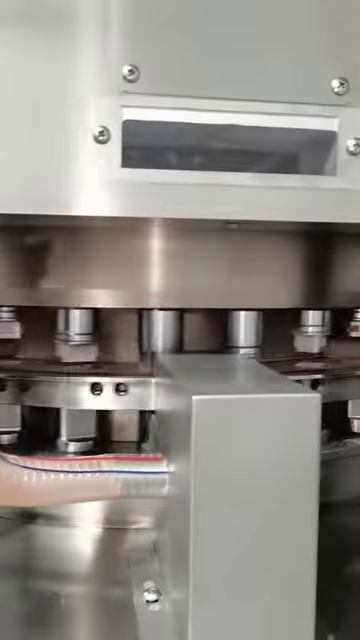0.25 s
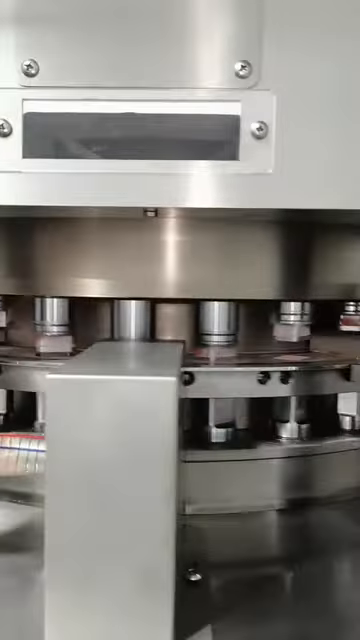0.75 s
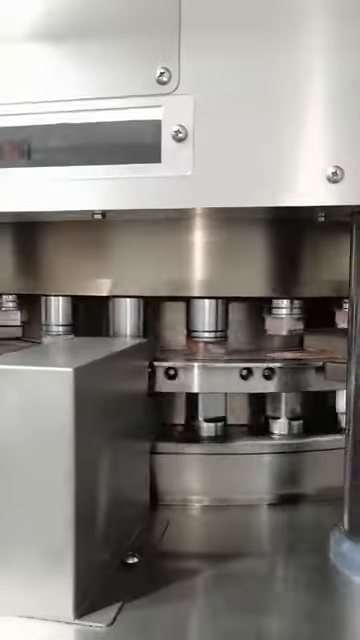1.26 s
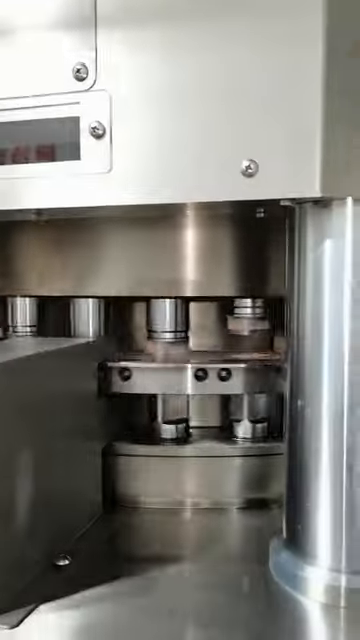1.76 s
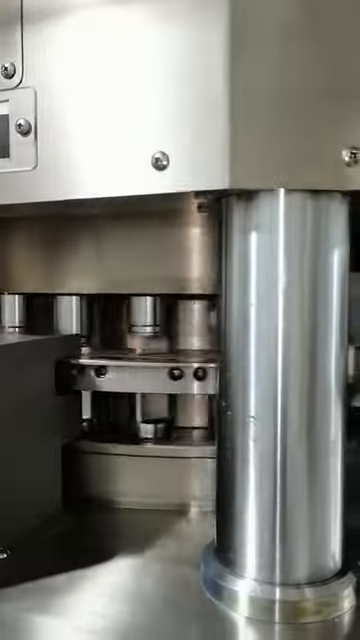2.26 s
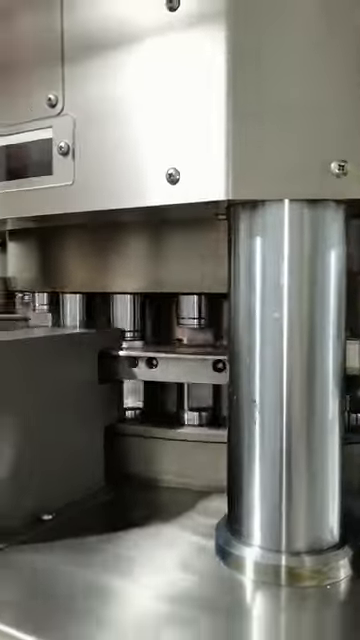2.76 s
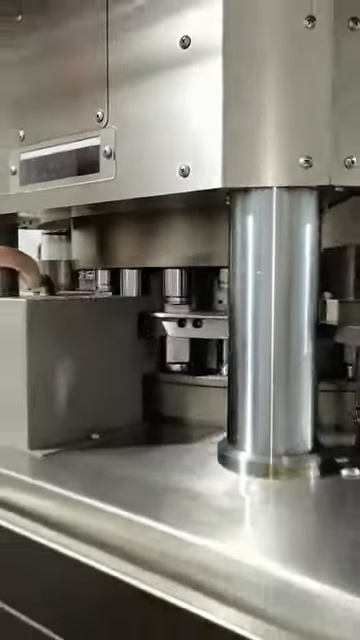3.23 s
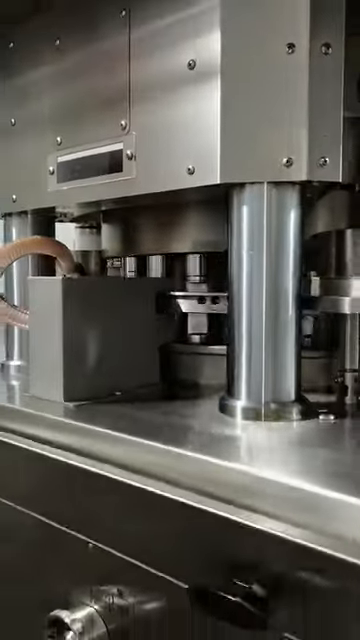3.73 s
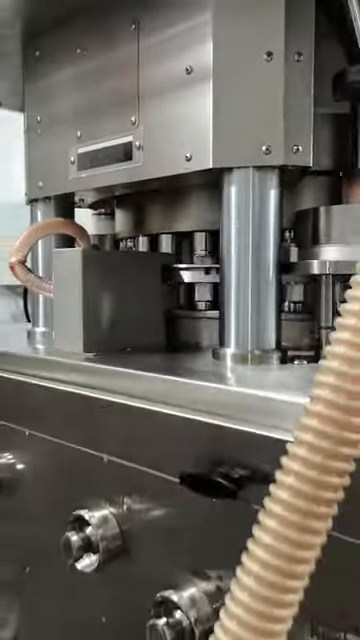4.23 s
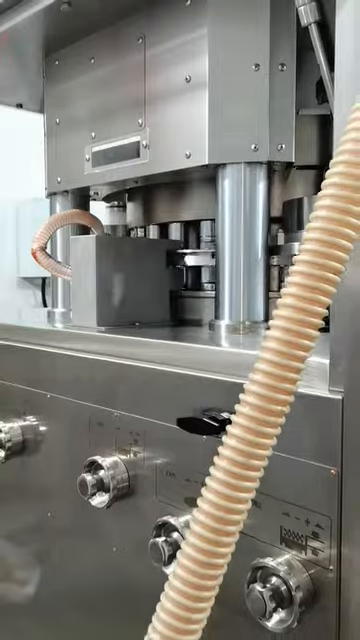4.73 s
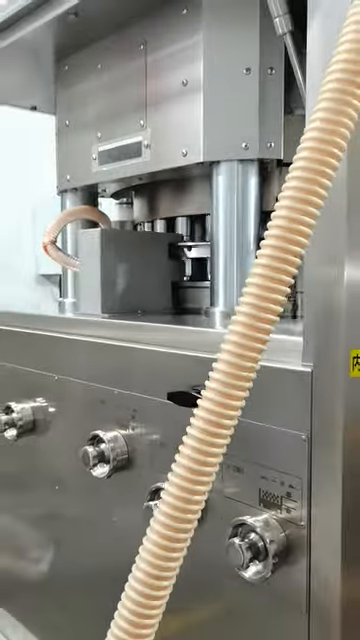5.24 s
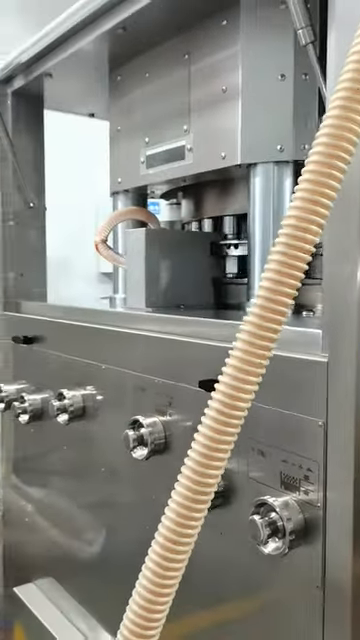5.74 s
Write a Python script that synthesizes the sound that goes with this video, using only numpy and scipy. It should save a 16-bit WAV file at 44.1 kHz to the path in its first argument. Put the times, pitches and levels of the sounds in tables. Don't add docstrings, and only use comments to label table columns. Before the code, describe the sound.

For the full six seconds a rotary tablet press runs steadily in a hard-walled factory hall, heard through a moving handheld stereo microphone. Three blower tones around 312, 332 and 338 hertz beat together; the hum shifts between sides, swells around 1.2 to 2.7 seconds, thins near 3.5, then grows into one strong tone from about 4.2 to the end. Wide air and gear roar fills the space, with an uneven low shaft throb leaning left. Thin drive whines near 4 kilohertz flicker in brief swells, notably near 1.1, 2.9 and 4 seconds. Every 0.27 seconds a small ejection knock precedes a metallic punch clack by a tenth of a second, mostly buried, ringing harder near 1, 1.5, 2 and 3.7 seconds. A dull far knock echoes at 2.4. After 5 seconds, retreat softens the roar and clacks; the extreme top stays dull.

```python
import sys
import numpy as np
from scipy import signal
from scipy.io import wavfile
from scipy.ndimage import uniform_filter1d

SR = 44100
rng = np.random.default_rng(int(sys.argv[2]) if len(sys.argv) > 2 else 0)


def unload_wav(signal):
    wavfile.write(
        sys.argv[1],
        SR,
        np.round(np.clip(np.atleast_2d(signal).T, -1, 1) * 32767).astype(np.int16),
    )


def boost_factor(decibels):
    exponent = np.asarray(decibels, float) / 20
    return 10 ** exponent


N = 264159
T = np.arange(N) / SR


def evened(x):
    return x / np.sqrt(np.mean(x ** 2) + 1e-20)


def read(points, hz):
    f, value = np.transpose(points)
    return np.interp(np.log(hz + 1), np.log(f + 1), value)


def columns(rows, t=T):
    s, *rest = np.transpose(rows)
    return np.array([np.interp(t, s, c) for c in rest])


def drift(rate_hz):
    knots = evened(uniform_filter1d(rng.standard_normal(400), size=3))
    return np.interp(T * rate_hz * 3, np.arange(400), knots)


def crests(rows, width_s, trough_db):
    gain = boost_factor(trough_db)
    for s, db in rows:
        gain = gain + boost_factor(db) * np.exp(-.5 * ((T - s) / width_s) ** 2)
    return 20 * np.log10(gain)


# time_s, distance_m
DISTANCE = [
    (0, 0.54),
    (1.2, 0.49),
    (2.3, 0.55),
    (4.0, 0.57),
    (5.0, 0.64),
    (6.0, 1),
]


def spread_db(t):
    return -20 * np.log10(columns(DISTANCE, t)[0] / .5)


# freq_hz, correlation
PORT_LIKENESS = [(60, 0.9), (130, 0.86), (290, 0.71), (640, 0.3), (1410, 0.02), (3100, 0.02), (6820, 0.01),
                 (15000, -0.01)]
# freq_hz, difference_db
PORT_TILT = [(60, 8.0), (110, 7.5), (200, 3.0), (380, 2.5), (700, -1.0), (1290, -3.0), (2380, -2.5),
             (4400, -4.5), (8120, 0), (15000, -8.5)]


def far_tone(hz, db, blur=.5, rate_hz=3, waver_db=0, side_db=0, flicker_db=4):
    mid_level_db = db + waver_db * drift(rate_hz)
    mid = boost_factor(mid_level_db) * np.cos(2 * np.pi * hz * T + blur * np.pi * drift(rate_hz))
    side_level_db = np.mean(db) + side_db + flicker_db * drift(rate_hz)
    side_phase = 2 * np.pi * (hz * T + rng.random()) + blur * np.pi * drift(rate_hz)
    side = boost_factor(side_level_db) * np.cos(side_phase)
    tilt = boost_factor(read(PORT_TILT, hz) * np.array([[.5], [-.5]]))
    return np.sqrt(2) * np.array([mid + side, mid - side]) * tilt


def far_knock():
    start_s, level_db, rise_s, t60_s, band_hz = 2.36, -22, .02, .9, (400, 840)
    t = np.maximum(T - start_s, 0)
    echo = rng.standard_normal(N) + .4 * rng.standard_normal((2, N))
    dull = signal.sosfilt(signal.butter(2, band_hz, "bandpass", fs=SR, output="sos"), echo)
    return boost_factor(level_db - 60 * t / t60_s) * np.minimum(t / rise_s, 1) * evened(dull)


# freq_hz, density_db_per_hz
ROAR_SPECTRUM = [(20, -45), (40, -35), (70, -27.5), (125, -15.5), (170, -18.5), (300, -18), (500, -21.5),
                 (1000, -21.5), (1150, -23.5), (2150, -22.5), (3140, -29.5), (4070, -23), (5000, -25.5),
                 (6000, -26.5), (7000, -22)]
# freq_hz, gain_db
PORT_RESPONSE = [(7000, -0.5), (7900, 0), (8200, -9.5), (8500, -17), (8900, -18.5), (9300, -14.5),
                 (9700, -10.5), (11000, -11), (13500, -14.5), (14800, -24), (15150, -20), (15200, -34),
                 (15700, -40)]


def roar():
    level_db = -18.5
    near_share = [(200, .81), (2000, .8), (7000, .23)]  # freq_hz, share of the 1 / r law
    frames, hz = N // 512 + 5, np.fft.rfftfreq(2048, 1 / SR)
    a, b, c, d, patches = rng.standard_normal((frames, 1025, 5)).T
    patches = uniform_filter1d(patches, size=24, axis=0)
    patches = evened(uniform_filter1d(patches, size=8, axis=1))
    swell = evened(uniform_filter1d(rng.standard_normal(frames), size=10))

    far_db = spread_db(np.arange(frames) * 512 / SR)
    walk_db = read(near_share, hz)[:, None] * (far_db - far_db.mean())
    same = np.clip(1.11 * read(PORT_LIKENESS, hz), -1, 1)[:, None]
    left = a + 1j * b
    right = same * left + np.sqrt(1 - same ** 2) * (c + 1j * d)
    tilt_db = read(PORT_TILT, hz)[:, None] * np.array([.6, -.6])[:, None, None]

    colour_db = (read(ROAR_SPECTRUM, np.minimum(hz, 6900)) + read(PORT_RESPONSE, hz))[:, None]
    flutter_db = .21 * swell * (hz[:, None] > 5000)
    notch_db = 2.5 * swell * (abs(hz[:, None] - 8900) < 700)
    z = np.array([left, right])
    z = z * boost_factor(colour_db + walk_db + .91 * patches + flutter_db + tilt_db + notch_db)
    return boost_factor(level_db) * evened(signal.istft(z, nperseg=2048, noverlap=1536)[1][:, :N])


# time_s, level_db
THROBS = [(.1, -35), (.45, -34), (.75, -32), (1.04, -29.5), (1.7, -34), (2.35, -33), (2.7, -38),
          (3.25, -39), (3.48, -31), (4.08, -32), (4.6, -33), (4.97, -37), (5.37, -39)]


def shaft():
    first_db = np.minimum(-45 + 1.6 * T, -38.3)
    throb_db = crests(THROBS, width_s=.084, trough_db=-45.5)
    first = boost_factor(first_db) * np.cos(2 * np.pi * 49.0 * T)
    throb = boost_factor(throb_db) * np.cos(2 * np.pi * 96.7 * T + .86 * drift(4.5))
    return np.sqrt(2) * (first + throb) * boost_factor(np.array([[3.], [-5.]]))


WHINE_HZ = [3979.8, 4055.7, 4109.4]
# time_s, level_db
WHINE_CRESTS = [
    [(.35, -37), (1.05, -37), (3.27, -48), (4.47, -44), (5.6, -40)],
    [(.27, -44), (.75, -42), (.95, -38), (1.65, -37), (2.12, -45), (2.55, -37), (2.92, -32), (4.25, -46),
     (5.12, -40)],
    [(.1, -30.5), (.32, -43), (.55, -39), (.78, -38), (.95, -36), (1.15, -30), (2.1, -48), (3.0, -44),
     (3.33, -34.5), (3.6, -34), (3.95, -31.5), (4.22, -29.5), (4.7, -38), (5.4, -42), (5.8, -45)],
]
# pitch_hz, level_db
FAINT_WHINES = [(3816, -50), (3889.6, -47), (4182, -49), (4220, -49), (4373, -49), (4500, -52), (5001, -53),
                (7297, -51), (7437, -50), (7773, -50), (7926, -51), (7961, -52), (8111.6, -50),
                (11945.4, -54), (12169, -57)]


def drives():
    out = np.zeros((2, N))
    for hz, rows in zip(WHINE_HZ, WHINE_CRESTS):
        db = crests(rows, width_s=.072, trough_db=-41)
        out += far_tone(hz, db, blur=.33, rate_hz=9, waver_db=1.8, side_db=1.5, flicker_db=4)
    for hz, db in FAINT_WHINES:
        out += far_tone(hz, db, blur=.6, rate_hz=5, waver_db=2.5, flicker_db=2.5)
    return out


BLADE_HZ = [312.5, 331.70, 337.78]
# time_s, left_db, right_db, left_extra_path_m, right_extra_path_m
HUM_A = [(0.0, -20.3, -15.1, -0.24, -0.28), (0.5, -24.7, -16.8, -0.43, -0.4),
         (0.75, -20.1, -22.7, -0.65, -0.48), (1.2, -13.1, -18.8, -0.53, -0.53),
         (1.55, -12.8, -16.7, -0.51, -0.53), (1.95, -13.5, -16.3, -0.59, -0.61),
         (2.75, -15.7, -19.5, -0.63, -0.74), (3.1, -23.7, -22.4, -0.68, -0.88),
         (3.5, -30.7, -23.2, -0.83, -0.93), (3.75, -23.8, -22.9, -1.1, -1.09),
         (3.95, -17.0, -18.5, -1.19, -1.2), (4.2, -12.6, -15.0, -1.23, -1.25),
         (4.85, -10.1, -13.4, -1.19, -1.24), (5.2, -9.5, -12.4, -1.2, -1.26),
         (5.95, -9.0, -11.8, -1.15, -1.22)]
HUM_B = [(0.0, -25.1, -23.3, -0.22, -0.11), (0.4, -25.6, -30.5, -0.43, -0.35),
         (0.55, -24.2, -27.2, -0.5, -0.46), (0.95, -22.9, -25.3, -0.44, -0.4),
         (1.2, -23.9, -29.8, -0.33, -0.25), (1.6, -19.2, -35.7, -0.37, -0.04),
         (2.1, -15.0, -31.5, -0.45, -0.04), (2.4, -15.2, -26.1, -0.45, -0.14),
         (3.0, -16.9, -24.1, -0.4, -0.18), (3.45, -18.8, -30.8, -0.44, 0.06),
         (3.9, -21.6, -25.2, -0.5, 0.12), (4.45, -25.5, -23.1, -0.65, 0.1), (5.1, -22.8, -23.5, -0.7, 0.11),
         (5.95, -24.3, -39.5, -0.51, 0.35)]
HUM_C = [(0.0, -41.9, -27.2, -0.06, 0.24), (0.65, -25.9, -29.5, -0.2, 0.09),
         (0.9, -23.4, -54.2, -0.23, -0.09), (1.15, -22.7, -36.6, -0.2, -0.41),
         (1.45, -21.0, -28.9, -0.22, -0.32), (2.35, -18.2, -22.1, -0.43, -0.42),
         (2.7, -18.2, -22.9, -0.46, -0.39), (3.0, -22.7, -22.9, -0.49, -0.33),
         (3.3, -31.4, -20.8, -0.37, -0.29), (3.55, -23.5, -19.0, -0.26, -0.29),
         (4.05, -19.2, -19.9, -0.35, -0.4), (4.5, -18.4, -21.2, -0.33, -0.36),
         (5.2, -16.7, -21.6, -0.41, -0.45), (5.95, -18.1, -22.6, -0.43, -0.39)]
# multiple, level_db
WEAK_OVERTONES = [
    [(8, -49)],
    [(4, -44), (5, -49), (6, -50), (7, -50)],
    [(2, -46), (3, -48)],
]
LOUD_OVERTONES = [(0, 2), (0, 3), (0, 4), (0, 5), (0, 6), (0, 7), (1, 2), (1, 3)]
# time_s, level_db
OVERTONE_CRESTS = [
    [(0, -45), (1.25, -35), (1.75, -35.5), (2.25, -40.5), (3.2, -39.5), (4.4, -41)],
    [(.7, -32.5), (2.1, -31.5), (2.65, -39.5), (4.05, -37), (4.85, -43)],
    [(1.2, -42), (2.5, -46.5), (3.3, -40), (5.2, -48)],
    [(.85, -37.5), (2.2, -49), (3.5, -40), (5.15, -47)],
    [(.25, -40), (1.3, -54), (3.4, -43.5), (4.65, -40.5)],
    [(1.8, -41), (4.17, -36.5), (5.5, -44)],
    [(1.15, -42), (1.8, -36), (2.35, -41), (3.35, -48), (4.8, -39.5)],
    [(0, -42), (1.0, -38), (1.75, -32.5), (2.8, -48), (3.95, -37), (4.55, -39.5), (5.2, -44.5),
     (5.85, -36.5)],
]


def blowers():
    sound_m_per_s = 343
    out = np.zeros((2, N))
    for hz, rows, weak in zip(BLADE_HZ, (HUM_A, HUM_B, HUM_C), WEAK_OVERTONES):
        curves = columns(rows)
        level_db, path_m = curves[:2], curves[2:]
        out += np.sqrt(2) * boost_factor(level_db) * np.cos(2 * np.pi * hz * (T - path_m / sound_m_per_s))
        for multiple, db in weak:
            out += far_tone(multiple * hz, db, blur=.4, rate_hz=1.5, waver_db=3, flicker_db=3)
    for (blower, multiple), rows in zip(LOUD_OVERTONES, OVERTONE_CRESTS):
        db = crests(rows, width_s=.21, trough_db=-45.5)
        out += far_tone(multiple * BLADE_HZ[blower], db, blur=.22, rate_hz=2, waver_db=.8, flicker_db=4)
    return out


def clack(modes, extra_db):
    t = np.arange(2500) / SR
    rattle = rng.standard_normal((2, 2500)) * np.exp(-t / .014)
    out = 0
    for (hz, db, t60_s), more_db in zip(modes, extra_db):
        ring = boost_factor(-60 * t / t60_s) * np.sin(2 * np.pi * hz * rng.uniform(.985, 1.015) * t)
        out = out + boost_factor(db + more_db) * evened(signal.fftconvolve(rattle, ring[None], axes=1))
    return out


# pitch_hz, level_db, t60_s
PUNCH_MODES = [(2185, -2.5, 0.018), (2540, -2.5, 0.025), (1430, -6, 0.0073), (3510, -5, 0.022),
               (5120, -5.5, 0.13)]
# pitch_hz, level_db, t60_s
EJECT_MODES = [(3120, -5, 0.013), (1423, 2, 0.0074), (6000, -22, 0.014)]
# time_s, holder_extra_db, tip_extra_db
HARD_BLOWS = [
    (.96, 9, 4),
    (1.51, 5, 5),
    (2.05, 0, 11.5),
    (3.68, 12, 0),
]


def punches():
    period_s, start_s, eject_lead_s = .2713, .150, .100
    punch_db, eject_db, blow_scatter_db, ring_scatter_db = -33, -33, 1.0, 1.5
    out = np.zeros((2, N + SR))
    times = np.arange(start_s, N / SR, period_s)
    chance = rng.standard_normal((len(times), 4))
    for s, (eject_luck, punch_luck, holder_luck, tip_luck) in zip(times, chance):
        hard = [row[1:] for row in HARD_BLOWS if abs(row[0] - s) < period_s / 2]
        soft = -ring_scatter_db * abs(np.array([holder_luck, tip_luck]))
        holder_db, tip_db = hard[0] if hard else soft
        far_db = 2 * spread_db(s)

        punch = clack(PUNCH_MODES, (0, 0, 0, holder_db, tip_db))
        punch = punch * boost_factor(punch_db + far_db + blow_scatter_db * punch_luck)
        eject = clack(EJECT_MODES, (0, 0, 0))
        eject = eject * boost_factor(eject_db + far_db + blow_scatter_db * eject_luck)

        punch_at = round((s - .01) * SR)
        eject_at = punch_at - round(eject_lead_s * SR)
        out[:, punch_at:punch_at + punch.shape[1]] += punch
        out[:, eject_at:eject_at + eject.shape[1]] += eject
    return out[:, :N] * boost_factor(np.array([[-1.5], [1.5]]))


def scene():
    return far_knock() + roar() + shaft() + drives() + blowers() + punches()


def roll_off(x):
    return signal.sosfilt(signal.butter(12, 15710, fs=SR, output="sos"), x)


def record(dry):
    dry = signal.sosfilt(signal.butter(3, 40, "highpass", fs=SR, output="sos"), dry)
    over = np.maximum(abs(dry) - .7, 0)
    capped = np.sign(dry) * (abs(dry) - over + .2 * np.tanh(over / .2))
    return roll_off(capped)


dry = scene()
out = record(dry)
unload_wav(out)
```